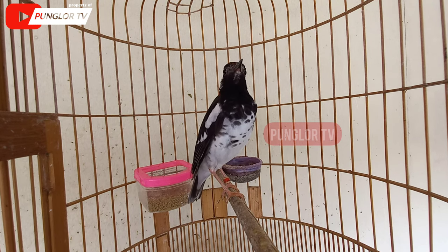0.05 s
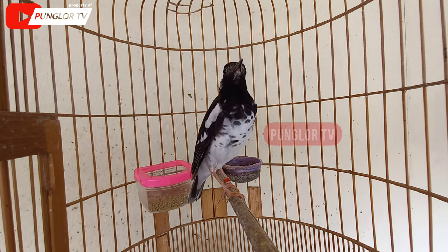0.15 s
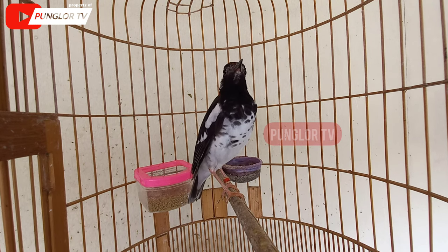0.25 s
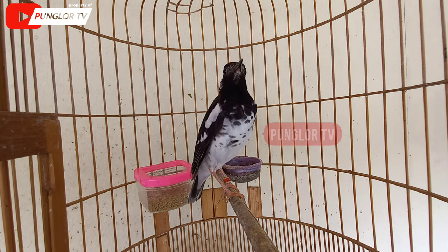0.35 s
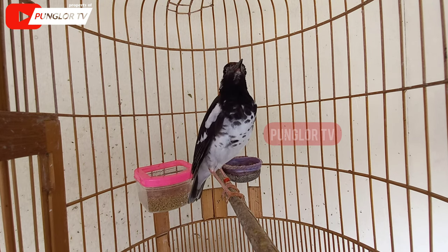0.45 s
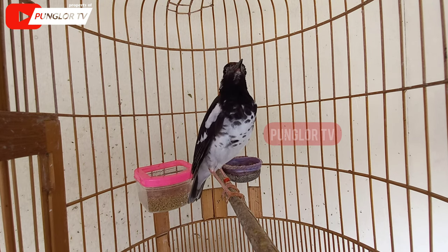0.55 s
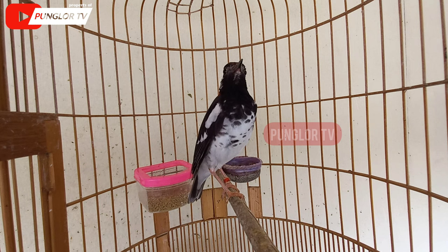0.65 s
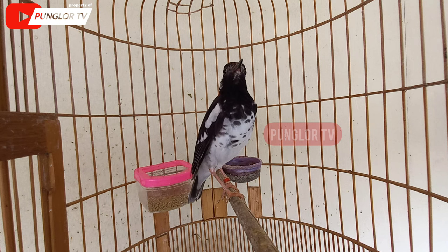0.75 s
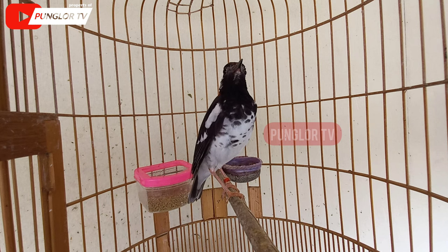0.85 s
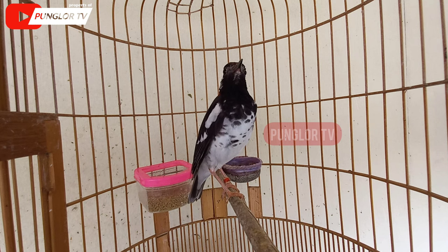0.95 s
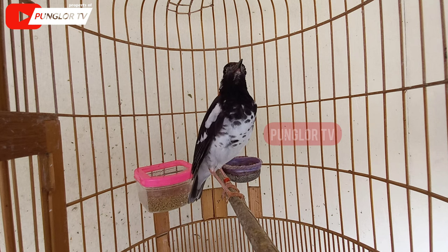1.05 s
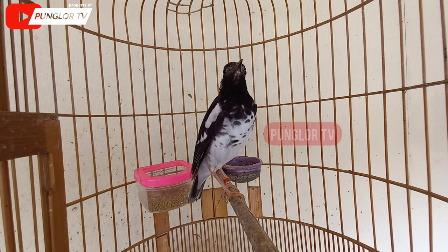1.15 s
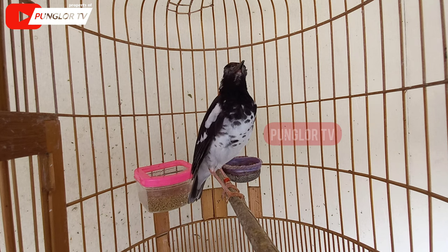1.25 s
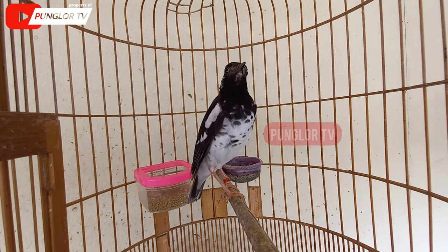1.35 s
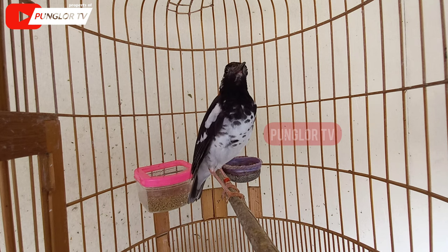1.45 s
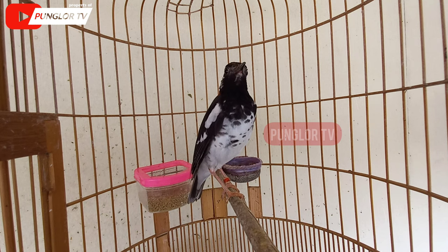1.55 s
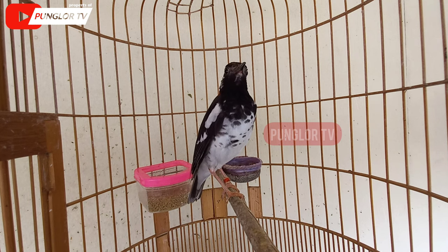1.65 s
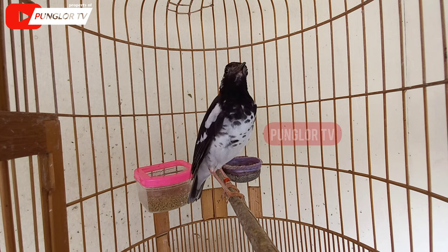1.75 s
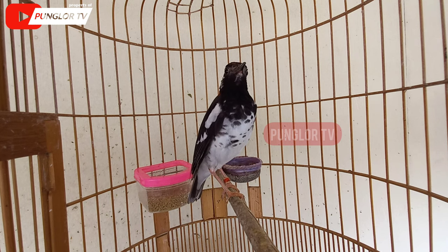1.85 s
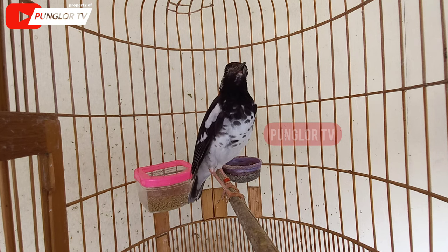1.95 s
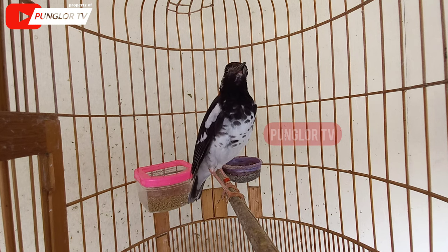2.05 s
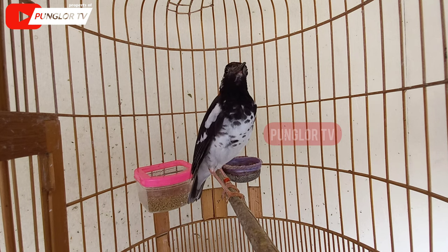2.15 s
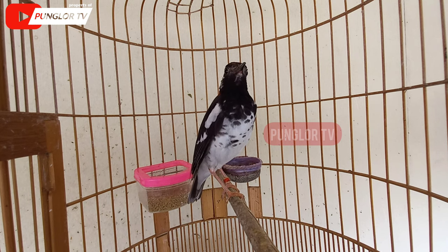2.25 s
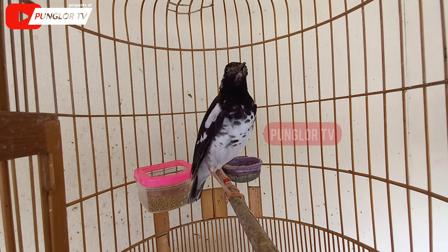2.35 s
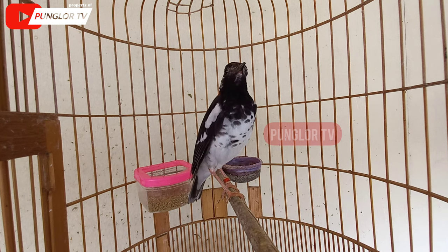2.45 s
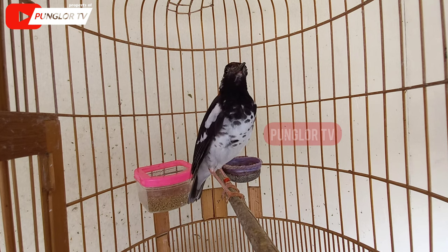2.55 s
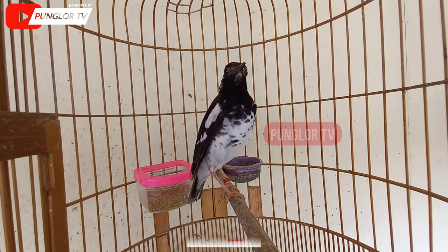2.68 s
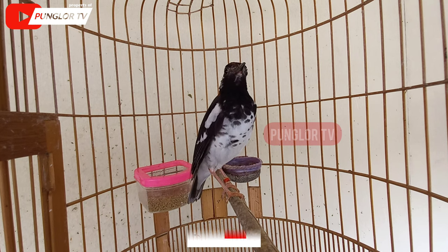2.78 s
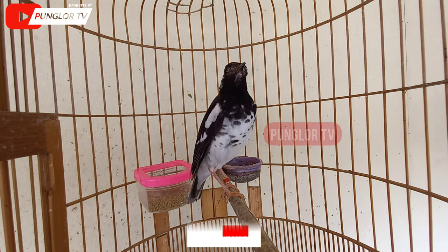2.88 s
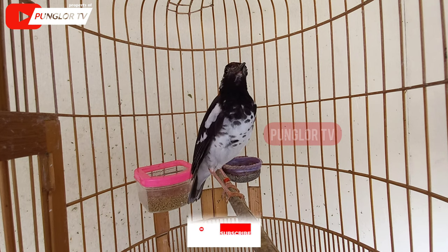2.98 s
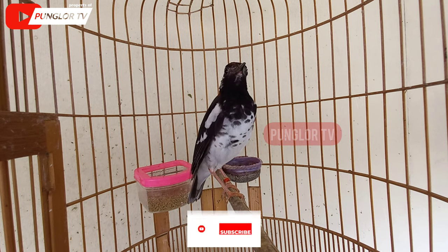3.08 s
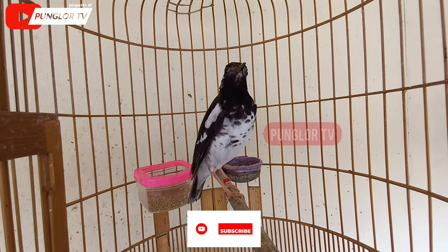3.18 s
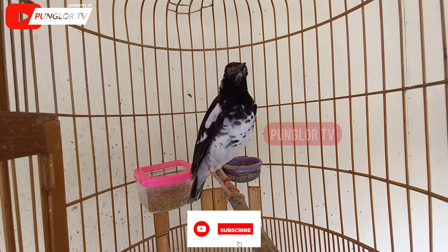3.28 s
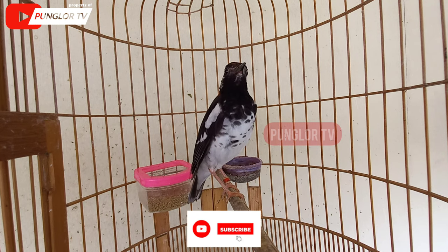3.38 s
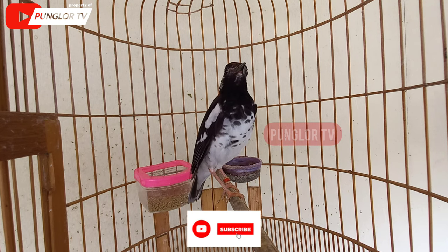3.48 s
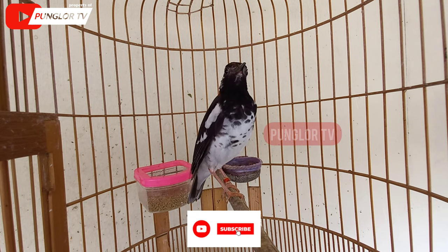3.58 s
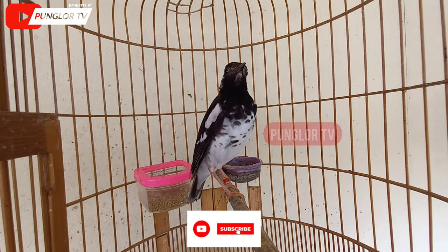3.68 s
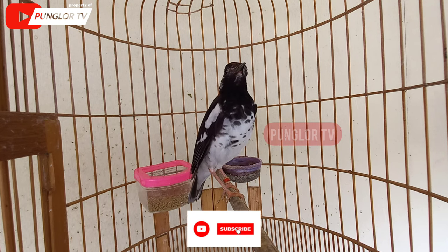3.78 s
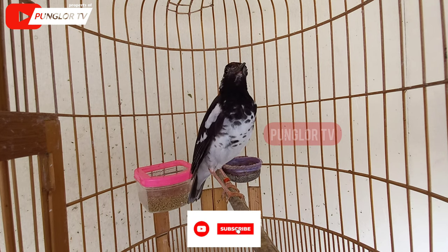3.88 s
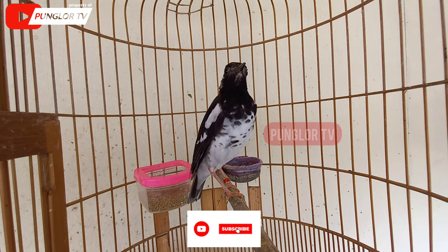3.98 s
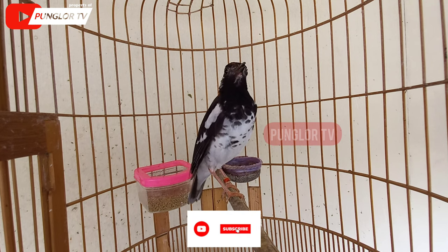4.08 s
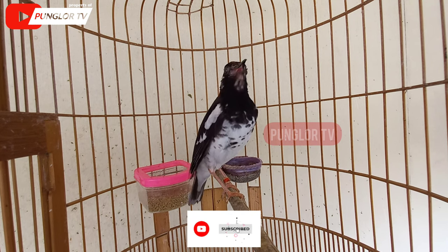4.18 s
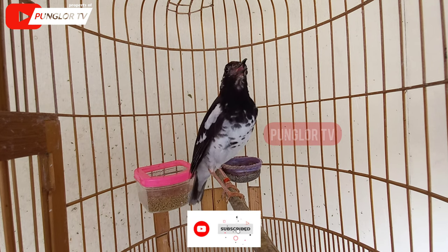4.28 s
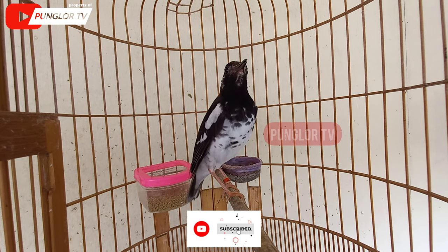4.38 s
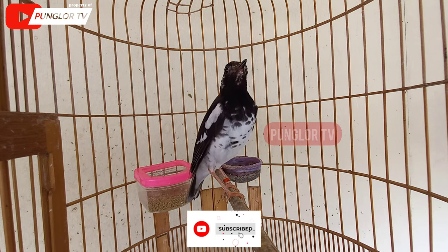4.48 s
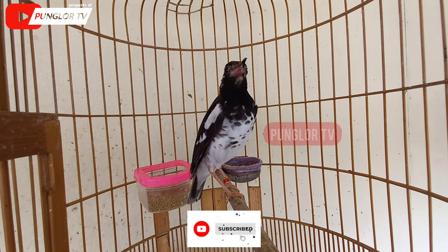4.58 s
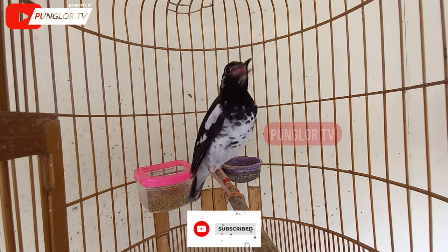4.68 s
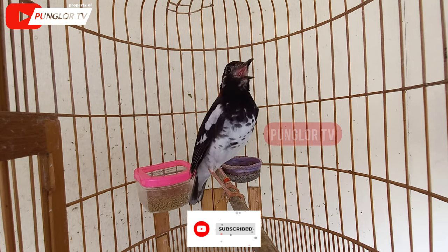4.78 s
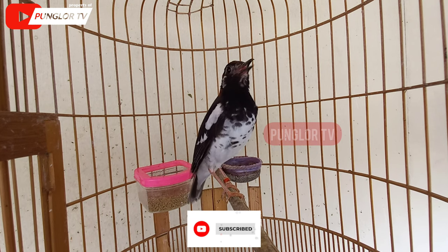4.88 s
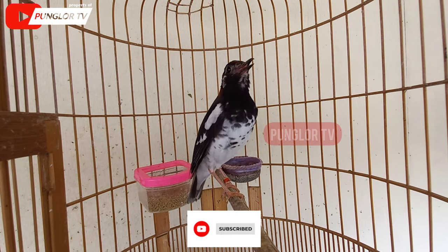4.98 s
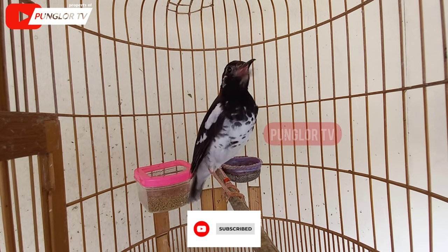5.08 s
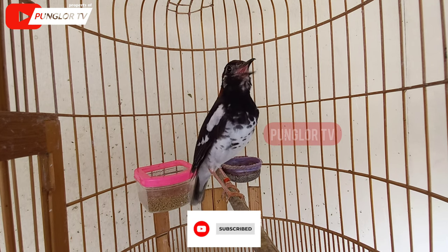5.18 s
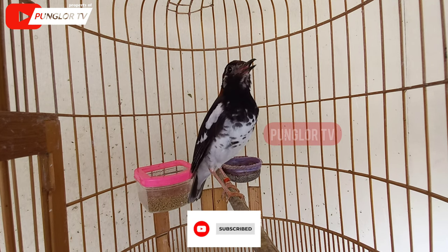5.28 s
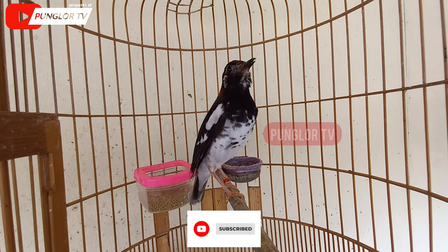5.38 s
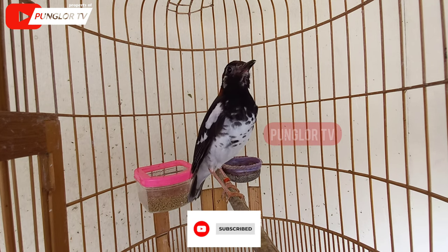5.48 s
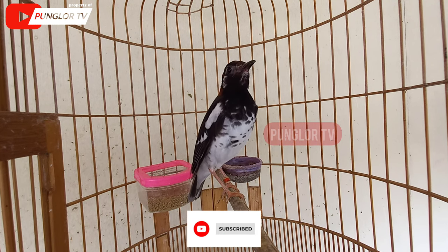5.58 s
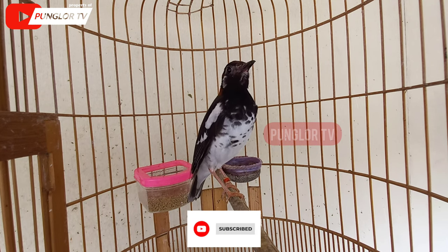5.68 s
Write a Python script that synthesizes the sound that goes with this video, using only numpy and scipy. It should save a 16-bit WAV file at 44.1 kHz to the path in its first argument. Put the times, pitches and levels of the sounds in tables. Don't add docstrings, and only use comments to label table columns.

```python
import sys
import numpy as np
from scipy import signal
from scipy.fft import rfft, irfft, next_fast_len
from scipy.io import wavfile
from scipy.ndimage import uniform_filter1d, minimum_filter1d

SR = 44100
rng = np.random.default_rng(int(sys.argv[2]) if len(sys.argv) > 2 else 0)


def dump(signal):
    limited = np.clip(np.atleast_2d(signal).T, -1, 1)
    pcm = np.round(limited * 32767).astype(np.int16)
    wavfile.write(sys.argv[1], SR, pcm)


def field_ratio(decibels):
    return 10 ** (np.asarray(decibels, dtype=float) / 20)


N = 253032

# t/s, f/Hz, level/dB
UPSWEEP = [(4.144, 1830, -22.5), (4.156, 2377, -7), (4.172, 2840, -4), (4.184, 3176, -10),
           (4.193, 2965, -11.5), (4.206, 2500, -23)]
LOW_WHISTLE = [(4.204, 2415, -21.5), (4.232, 2404, -2), (4.255, 2366, -7.5), (4.268, 2323, -5),
               (4.285, 2393, -19), (4.298, 2420, -28.5)]
SHORT_ARCH_LOW = [(4.330, 1844, -34.5), (4.345, 2062, -17.5), (4.368, 2010, -19), (4.378, 1524, -21.5)]
SHORT_ARCH_HIGH = [(4.330, 3490, -18.5), (4.340, 3863, -18.5), (4.362, 3730, -25.5), (4.378, 2710, -16.5)]
HIGH_WHISTLE = [(4.605, 3020, -26.5), (4.610, 5850, -31.5), (4.615, 6800, -29), (4.623, 6970, -15),
                (4.680, 6894, -15.5), (4.700, 6825, -14), (4.724, 6845, -11.5)]
UNDERTONE = [(4.672, 3460, -54.5), (4.700, 3410, -50.5), (4.724, 3430, -50.5)]
INTAKE = [(4.755, 2986, -46.5), (4.786, 2640, -28.5)]
LONG_ARCH_LOW = [(4.793, 1905, -32.5), (4.805, 2277, -17), (4.860, 2381, -17), (4.898, 2250, -17.5),
                 (4.908, 1740, -27.5)]
LONG_ARCH_HIGH = [(4.782, 2350, -23), (4.790, 3490, -13), (4.800, 4225, -11), (4.830, 4417, -11),
                  (4.870, 4467, -17), (4.895, 4180, -15), (4.912, 3110, -12.5)]
STEP_DOWN = [(5.004, 3133, -9.5), (5.017, 3083, -11), (5.027, 2255, -9), (5.034, 2295, -8)]
FLICK = [(5.050, 2207, -11.5), (5.058, 2620, -10), (5.066, 3402, -1.5), (5.073, 3810, -12.5),
         (5.078, 3385, -20.5), (5.084, 2094, -10.5)]
GRACE = [(5.147, 4300, -14), (5.153, 4603, -22), (5.166, 3650, -11)]
LONG_WHISTLE = [(5.153, 3470, -16.5), (5.166, 3436, -10), (5.178, 3298, 0.5), (5.212, 3144, -3),
                (5.222, 3133, -15), (5.232, 3103, -5), (5.247, 3103, -13.5)]
RASP_LOW = [(5.328, 1930, -32.5), (5.340, 1836, -32.5), (5.360, 1662, -28.5)]
RASP_HIGH = [(5.324, 2644, -39), (5.340, 2400, -34.5), (5.358, 2294, -29.5)]
TRILL = [(5.364, 1970, -13), (5.380, 1985, -21), (5.400, 1964, -16), (5.440, 1900, -15), (5.462, 1673, -29)]
# harmonics 2, 3, 4, 5 and up, level/dB re first
BRIGHT, ROUND, REEDY = (-32, -17.5, -27, -42), (-32, -32, -39.5, -20), (-20.5, -26.5, -29.5, -29)
THIN, NASAL, HOARSE = (-9, -42, -56, -61), (-25, 12.5, -30.5, -37), (2.7, -29, -27.5, -34)
RICH, PURE = (-20, -16, -28.5, -39.5), (-38, -39, -29.5, -40.5)


def rms_one(x):
    return x / np.sqrt(np.mean(x ** 2) + 1e-20)


def in_time(rows):
    s, values = np.transpose(rows)
    return np.interp(np.arange(N) / SR, s, values)


def at_hz(points, hz):
    f, values = np.transpose(points)
    return np.interp(np.log(np.maximum(hz, 1)), np.log(f), values)


def coloured(spectrum):
    # f/Hz, correlation
    likeness = [(60, 0.98), (130, 0.95), (290, 0.87), (640, 0.4), (1410, 1), (3100, 0.16), (6820, -1.7),
                (15000, -1.8)]
    size = next_fast_len(N, real=True)
    hz = np.fft.rfftfreq(size, 1 / SR)
    mid, side = rfft(rng.standard_normal((2, size)))
    alike = np.clip(at_hz(likeness, hz), 0, 1)
    pair = np.sqrt(1 + alike) * mid + np.sqrt(1 - alike) * side * [[1], [-1]]
    return rms_one(irfft(pair * field_ratio(at_hz(spectrum, hz)), size)[:, :N])


def patchy(x, depth_db, bins, frames):
    cells = signal.stft(x, nperseg=2048)[2]
    field = rng.standard_normal(cells.shape[1:])
    field = uniform_filter1d(field, size=bins, axis=0)
    field = uniform_filter1d(field, size=frames, axis=1)
    swollen = cells * field_ratio(depth_db * rms_one(field))
    return rms_one(signal.istft(swollen, nperseg=2048)[1][:, :N])


def wander(rate_hz):
    low_pass = signal.butter(2, rate_hz, fs=SR, output="sos")
    return rms_one(signal.sosfilt(low_pass, rng.standard_normal(N)))


def late(x, ms):
    return np.interp(np.arange(N) - ms * SR / 1000, np.arange(N), x, left=0)


def reverb(x, t60, rise_ms):
    t = np.arange(SR) / SR
    decay = field_ratio(-60 * t / t60) * (1 - np.exp(-t * 1000 / rise_ms))
    tail = rng.standard_normal((2, SR)) * decay
    return signal.fftconvolve(x[None], tail / np.sqrt(np.sum(tail ** 2) / 2), axes=1)


def thrush():
    # note, voice, breath level/dB, warble rate f/Hz, warble depth/share of pitch
    song = [(UPSWEEP, RICH, -15, 0, 0.019), (LOW_WHISTLE, ROUND, -26, 0, 0),
            (SHORT_ARCH_LOW, REEDY, -5, 147.5, 0.071), (SHORT_ARCH_HIGH, REEDY, -13, 140, 0.044),
            (HIGH_WHISTLE, THIN, -44, 0, 0.0028), (UNDERTONE, NASAL, -34, 0, 0),
            (INTAKE, HOARSE, -1.5, 520, 0.16), (LONG_ARCH_LOW, BRIGHT, -19.5, 150, 0.036),
            (LONG_ARCH_HIGH, REEDY, -16.5, 110, .07), (STEP_DOWN, PURE, -21.5, 0, 0.016),
            (FLICK, BRIGHT, -20, 0, 0.0013), (GRACE, PURE, -14, 0, 0.01),
            (LONG_WHISTLE, BRIGHT, -27.5, 0, 0), (RASP_LOW, HOARSE, -8, 55, 0.026),
            (RASP_HIGH, REEDY, -8, 230, .08), (TRILL, ROUND, -24.5, 57, 0.063)]
    # f/Hz, density level/dB
    breath_tone = [(1500, -19), (3000, 6), (4500, -9), (5800, -14), (7000, -13.5), (8500, -19),
                   (10500, -5.5), (13000, 0), (15000, -1), (16500, -6)]
    out, all_shake, all_flutter = np.zeros(N), wander(370), wander(120)
    all_breath = patchy(coloured(breath_tone), depth_db=3.0, bins=12, frames=2)[0]
    for rows, overtones_db, breath_db, warble_hz, depth in song:
        s, pitches, levels = np.transpose(rows)
        span = slice(int(s[0] * SR), int(s[-1] * SR))
        t, breath, shake = np.arange(N)[span] / SR, all_breath[span], all_shake[span]
        hz = uniform_filter1d(np.interp(t, s, pitches), size=160, mode="nearest")
        level_db = np.interp(t, s, levels)

        beat = 2 * np.pi * warble_hz * (t - s[0]) + 3.2 * depth * shake
        swing = np.cos(beat - 0.6) + 0.43 * np.sin(2 * beat)
        phase = 2 * np.pi * np.cumsum(hz * (1 + depth * swing + 0.0017 * shake)) / SR

        effort = field_ratio(0.38 * (level_db - levels.max()))
        tone = np.zeros(len(t))
        for k, harmonic_db in enumerate([0, *overtones_db, overtones_db[-1] - 0.5], start=1):
            harmonic = np.sin(k * phase) * (k * hz < 20000)
            tone += field_ratio(harmonic_db) * effort ** min(k - 1, 2) * harmonic

        inside = np.minimum(t - s[0], s[-1] - t)
        airflow = np.clip(inside / 0.015, 0, 1)
        throb = 1 + 2.0 * depth * swing + 1.6 * depth * all_flutter[span]
        voice = np.sqrt(2) * tone + field_ratio(breath_db) * airflow * breath
        out[span] += np.clip(inside / 0.002, 0, 1) * field_ratio(level_db) * throb * voice
    return signal.sosfilt(signal.butter(4, 1300, "high", fs=SR, output="sos"), out)


def near_room(bird):
    # left delay t/ms, right delay t/ms, level/dB
    echoes = [(2.9, 5.6, -5.5), (6.3, 16, -15.5), (11.0, 12.1, -9.5)]
    heard = np.array([bird, field_ratio(-1.0) * late(bird, ms=0.1)])
    for left_ms, right_ms, db in echoes:
        heard = heard + field_ratio(db) * np.array([late(bird, left_ms), late(bird, right_ms)])
    dull = signal.sosfilt(signal.butter(1, 7000, fs=SR, output="sos"), bird)
    return heard + field_ratio(-10.5) * reverb(dull, t60=0.38, rise_ms=3.3)[:, :N]


def far_notes():
    # onset t/s, length t/s, from f/Hz, to f/Hz, level/dB
    motif = [(0.001, 0.058, 3300, 2764, -51), (0.043, 0.055, 1584, 1538, -70),
             (0.12, 0.0458, 3790, 3436, -48), (0.157, 0.045, 2620, 2470, -56),
             (0.202, 0.09, 3381, 3329, -45)]
    motif_buzz = [0.08, 0.062, 0.022, 0.086, 0.023]
    # t/s, time stretch, pitch factor, level/dB
    repeats = [(1.224, 0.97, 1.02, 2), (1.595, 1.046, 0.99, 0.9), (1.991, 0.91, 0.998, 0.2),
               (2.386, 0.9, 0.98, -2.5), (2.776, 0.97, 0.98, -1.6)]
    # t/s, length t/s, from f/Hz, to f/Hz, level/dB
    leads = [(1.197, 0.065, 4640, 4470, -43.5), (1.567, 0.06, 4580, 4500, -46),
             (1.933, 0.087, 4404, 4535, -49.5), (2.328, 0.09, 4385, 4490, -50),
             (2.717, 0.072, 4736, 4825, -47.5), (3.138, 0.063, 4470, 4610, -47)]
    # t/s, length t/s, from f/Hz, to f/Hz, level/dB
    loose_clear = [(0.03, 0.094, 3843, 4110, -41), (0.998, 0.12, 3750, 3730, -53),
                   (3.407, 0.0356, 4870, 5100, -62.5), (3.563, 0.037, 5100, 5170, -58.5)]
    # t/s, length t/s, from f/Hz, to f/Hz, level/dB
    loose_buzzy = [(-.06, 0.12, 3133, 3713, -45.5), (0.458, 0.027, 5020, 4880, -65),
                   (1.066, 0.081, 3480, 3760, -44.5), (2.506, 0.041, 1960, 1950, -63),
                   (3.197, 0.0395, 3270, 2750, -53.5), (3.213, .06, 2470, 2480, -66),
                   (3.997, 0.095, 5300, 5380, -67)]
    notes = []
    for s, stretch, pitch, more_db in repeats:
        for (after, length, a, b, db), buzz in zip(motif, motif_buzz):
            notes.append((s + after * stretch, length, a * pitch, b * pitch, db + more_db, buzz))
    notes += [(*row, 0.025) for row in [*leads, *loose_clear]]
    return notes + [(*row, 0.065) for row in loose_buzzy]


def far_bird():
    lead = SR // 10
    out, all_shake = np.zeros(N), wander(250)
    for s, length, from_hz, to_hz, db, buzz in far_notes():
        span = slice(lead + int(s * SR), lead + int((s + length) * SR))
        part = np.linspace(0, 1, span.stop - span.start)
        hz = (from_hz + (to_hz - from_hz) * part) * (1 + buzz * all_shake[span])
        phase = 2 * np.pi * np.cumsum(hz) / SR
        overtones_db = -19.5 + 2.0 * (db + 39.5)
        tone = np.sin(phase) + field_ratio(overtones_db) * (np.sin(2 * phase) + np.sin(3 * phase))
        out[span] += field_ratio(db + 11.5) * np.sqrt(np.sin(np.pi * part).clip(0)) * tone
    return reverb(out, t60=0.6, rise_ms=4.2)[:, lead:lead + N]


def rustle_envelopes():
    # t/s, length t/s, level/dB, top level/dB re body
    rustles = [(-0.03, 0.097, -66.5, 1), (0.301, 0.24, -67.5, 2), (0.562, 0.11, -64.5, 1.5),
               (0.751, 0.038, -63, 3.5), (0.88, 0.3, -73.5, 1.5), (1.047, 0.1, -63.5, -13),
               (1.19, 0.11, -64.5, -19), (1.37, 0.17, -57, -7), (1.532, 0.11, -60.5, -2),
               (1.74, 0.1, -73, -25), (1.875, 0.23, -60, -16), (2.188, 0.092, -63.5, -12),
               (2.3, 0.25, -64.5, -9), (2.553, 0.25, -64, -19), (3.157, 0.17, -71.5, -19),
               (3.433, 0.12, -78, 1), (3.598, 0.14, -73.5, -13), (4.029, 0.15, -76.5, -12)]
    t = np.arange(N) / SR
    body = np.full(N, field_ratio(-84)) * (t < UPSWEEP[0][0])
    top = body * field_ratio(-11.0)
    for s, length, db, top_db in rustles:
        swell_s = 0.033 + 0.31 * length
        fall_db = 117.5 * np.maximum(t - s - length, 0)
        shape = np.clip((t - s) / swell_s, 0, 1) * field_ratio(db - fall_db)
        body, top = body + shape, top + field_ratio(top_db) * shape
    return body, top


def rustle():
    # f/Hz, density level/dB
    body_tone = [(1800, -27.5), (2800, -11.5), (4000, -4.5), (5400, 3), (7200, -5.5), (10000, -8),
                 (12500, -19.5)]
    # f/Hz, density level/dB
    top_tone = [(8000, -10.5), (11000, 1), (13000, -2), (15800, -13)]
    body_level, top_level = rustle_envelopes()
    brush = patchy(coloured(body_tone), depth_db=3.0, bins=8, frames=3)
    return field_ratio(5.0) * (body_level * brush + top_level * field_ratio(-3.0) * coloured(top_tone))


def motor():
    # f/Hz, width f/Hz, level/dB
    modes = [(95.8, 23.3, -2.5), (127.8, 19.4, 6), (157, 9.6, -14.5)]
    # f/Hz, level/dB re throb
    hum = [(100, -5), (600, -32)]
    # t/s, level/dB
    load = [(0.0, -37.5), (0.08, -42), (0.13, -33), (0.45, -46.5), (1.2, -35.5), (1.92, -40.5),
            (2.0, -31.5), (2.21, -38.5), (3.9, -39.5), (4.11, -38), (4.28, -46), (4.46, -41.5),
            (4.59, -49.5), (4.65, -41.5), (5.71, -52.5), (5.74, -42)]
    hz, t = np.geomspace(20, 400, num=80), np.arange(N) / SR
    body = sum(field_ratio(db) / (1 + (2 * (hz - f) / width) ** 2) for f, width, db in modes)
    throb = field_ratio(-4.0) * coloured(np.transpose([hz, 20 * np.log10(body)]))
    lines = np.zeros(N)
    for f, db in hum:
        lines += field_ratio(db + 2.0 * wander(5.6)) * np.sqrt(2) * np.sin(2 * np.pi * f * t)
    return field_ratio(in_time(load) + 1.5) * (throb + lines)


def traffic():
    # f/Hz, density level/dB
    room_tone = [(100, -29.5), (170, -3), (376, -7.5), (409, -10), (600, -13.5), (660, -16.5), (834, -21),
                 (1350, -32.5), (2000, -34.5), (2750, -52.5), (4500, -64), (5850, -91.5), (9900, -120)]
    # t/s, level/dB
    room_level = [(0.0, -49), (0.49, -50.5), (1.09, -52), (1.28, -50), (1.42, -51), (2.04, -48),
                  (2.76, -52), (3.26, -46.5), (3.47, -50), (4.2, -50.5), (4.46, -54), (5.13, -53),
                  (5.63, -60.5), (5.74, -64)]
    room = patchy(coloured(room_tone), depth_db=4.0, bins=3, frames=7)
    return field_ratio(in_time(room_level) + 2.5) * room


def scene():
    return near_room(thrush()) + far_bird() + rustle() + motor() + traffic()


def band_limit(x):
    return signal.sosfilt(signal.butter(12, 15840, fs=SR, output="sos"), x)


def record(dry):
    peak = -minimum_filter1d(-np.abs(dry).max(axis=0), size=200)
    held = dry / np.maximum(uniform_filter1d(peak, size=200) / 1.04, 1)
    held = held + 0.0048 * held ** 2
    hash_filter = signal.butter(1, 5000, fs=SR, output="sos")
    hash_noise = signal.sosfilt(hash_filter, rng.standard_normal(dry.shape))
    strain = np.minimum(uniform_filter1d(peak, size=600), 1.2) ** 2.6
    held = held + field_ratio(-37.5) * strain * hash_noise
    fade = np.clip((N - np.arange(N)) / SR / 0.012, 0, 1)
    top_cut = signal.cheby2(12, 60, 16600, fs=SR, output="sos")
    x = signal.sosfilt(top_cut, np.clip(held, -1, 1)) * fade
    return band_limit(np.clip(x, -1, 1))


dry = scene()
out = record(dry)
dump(out)
```